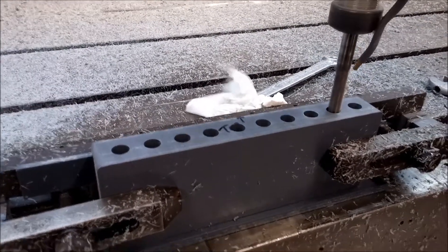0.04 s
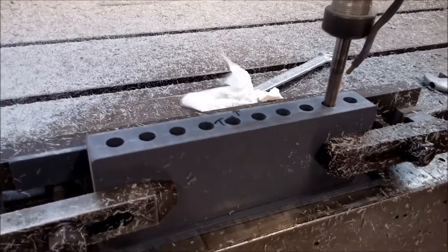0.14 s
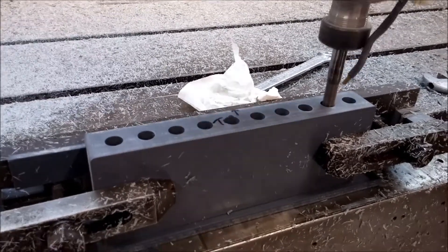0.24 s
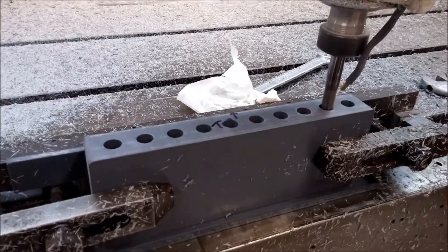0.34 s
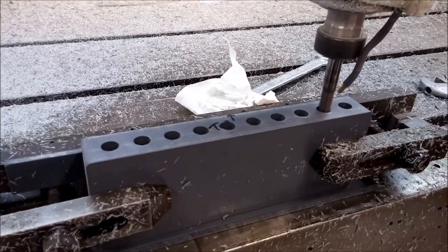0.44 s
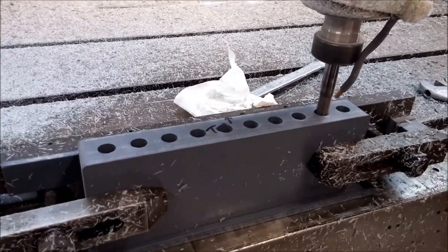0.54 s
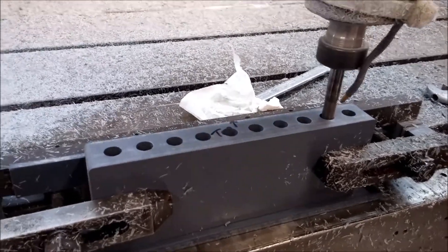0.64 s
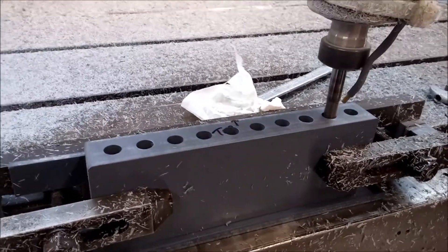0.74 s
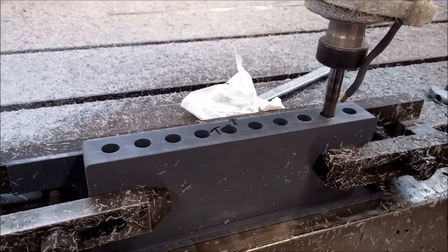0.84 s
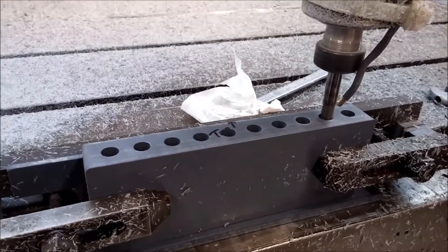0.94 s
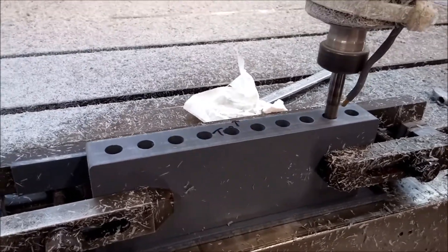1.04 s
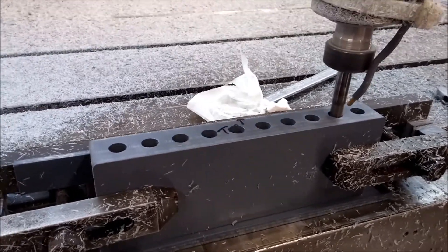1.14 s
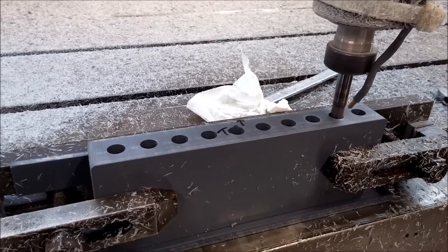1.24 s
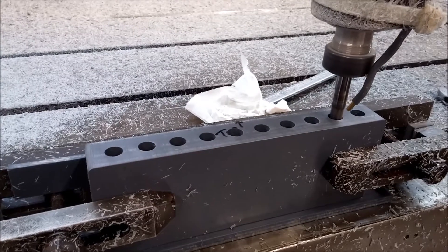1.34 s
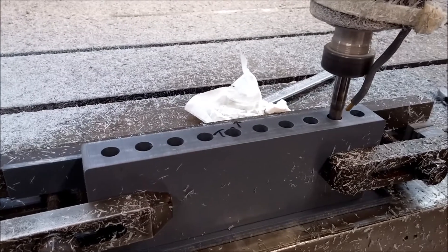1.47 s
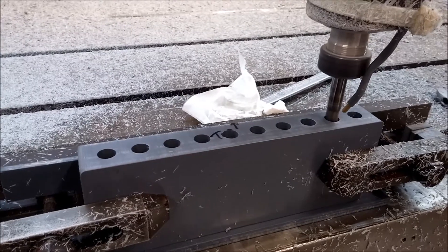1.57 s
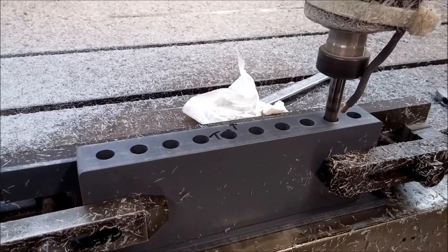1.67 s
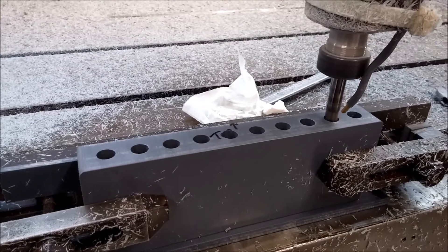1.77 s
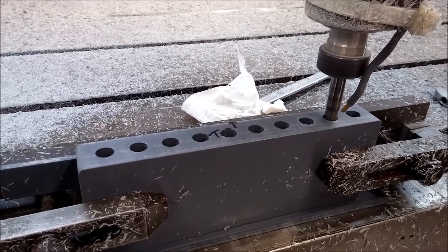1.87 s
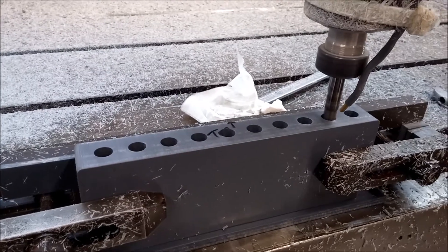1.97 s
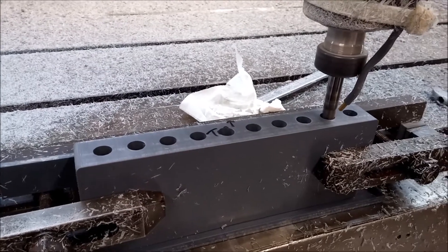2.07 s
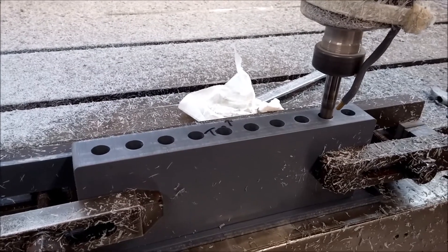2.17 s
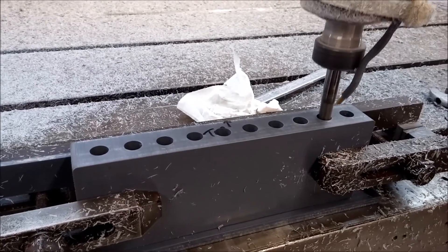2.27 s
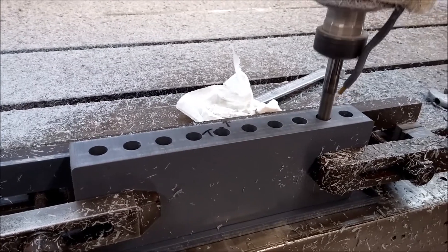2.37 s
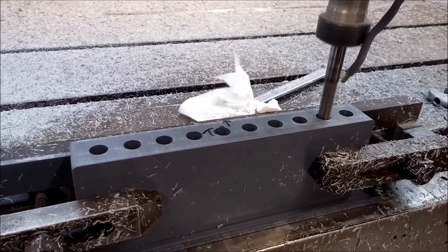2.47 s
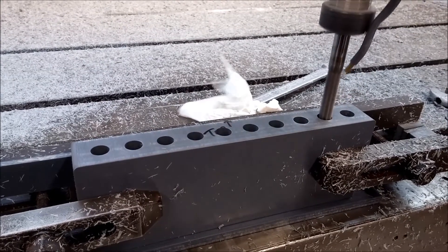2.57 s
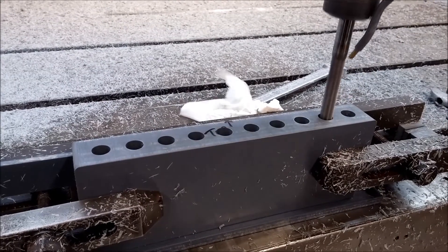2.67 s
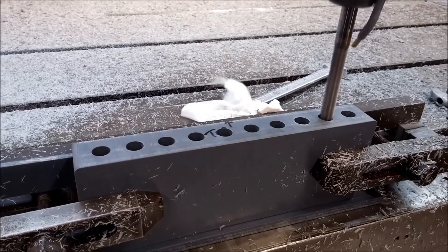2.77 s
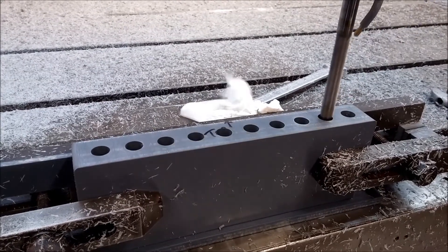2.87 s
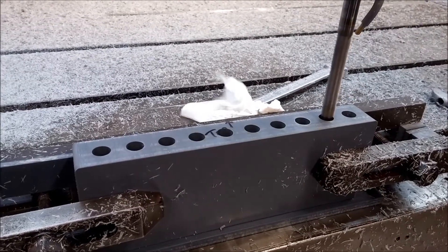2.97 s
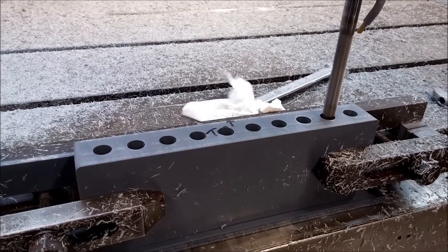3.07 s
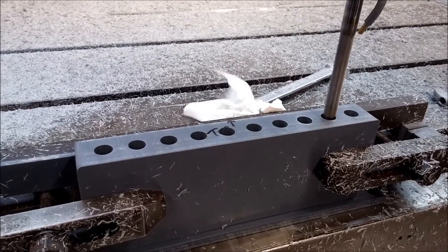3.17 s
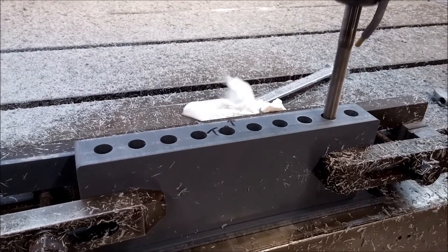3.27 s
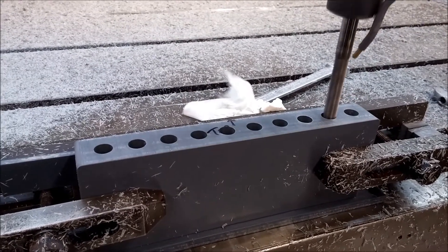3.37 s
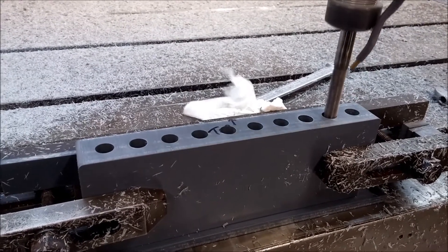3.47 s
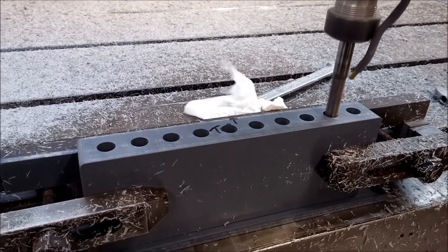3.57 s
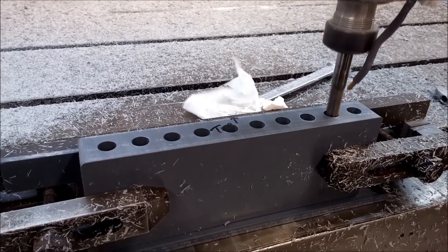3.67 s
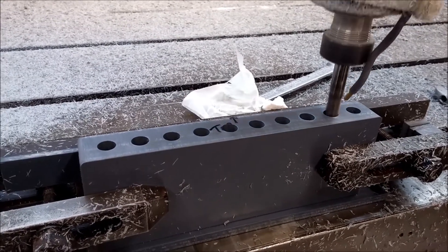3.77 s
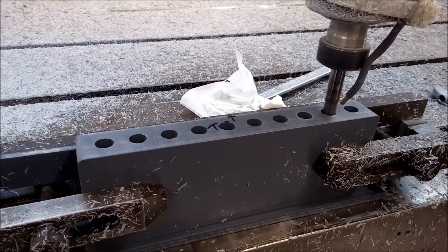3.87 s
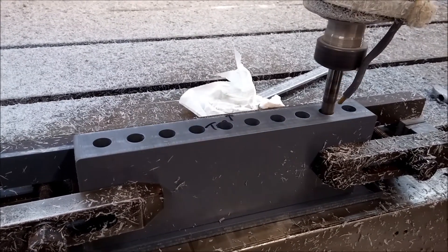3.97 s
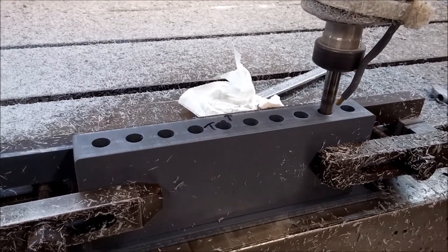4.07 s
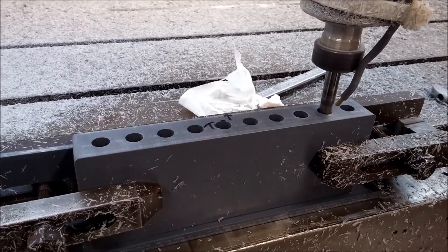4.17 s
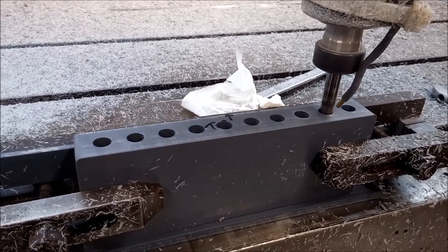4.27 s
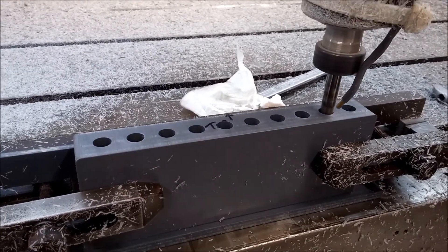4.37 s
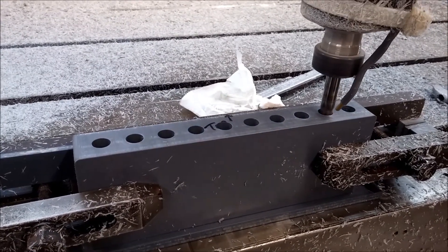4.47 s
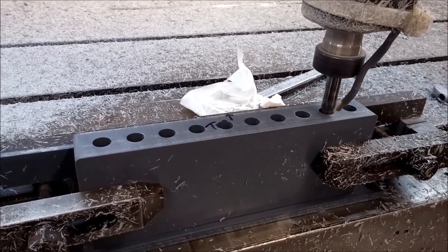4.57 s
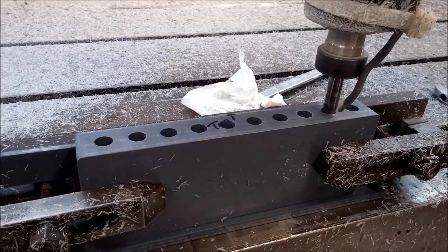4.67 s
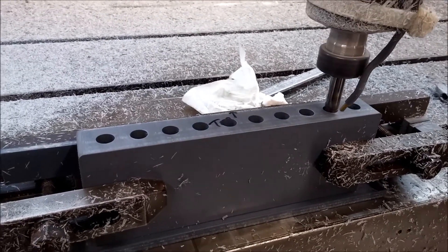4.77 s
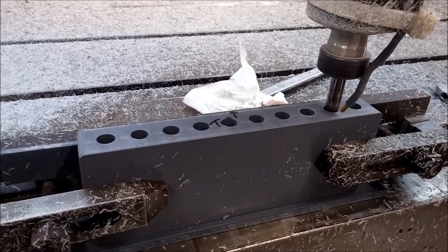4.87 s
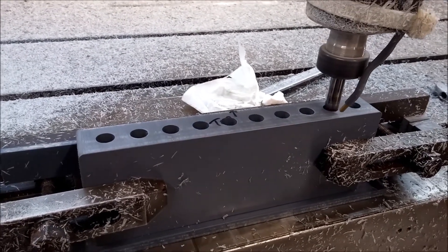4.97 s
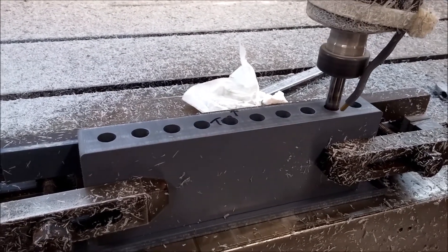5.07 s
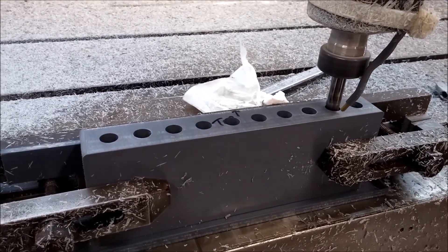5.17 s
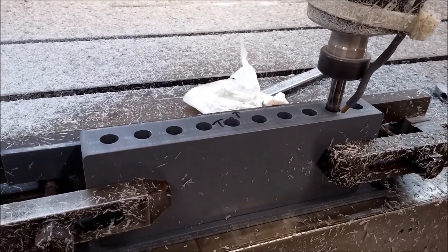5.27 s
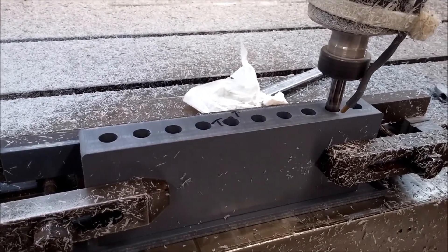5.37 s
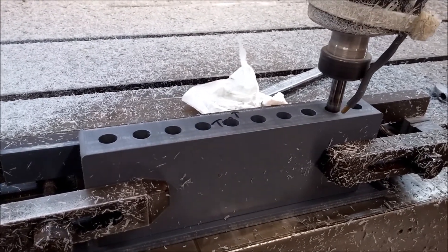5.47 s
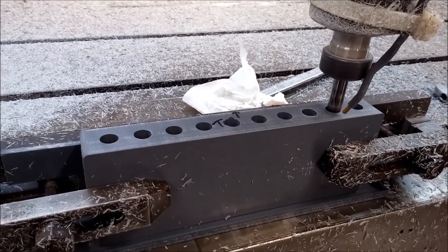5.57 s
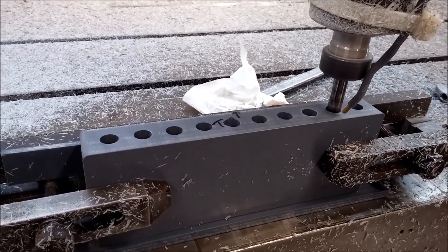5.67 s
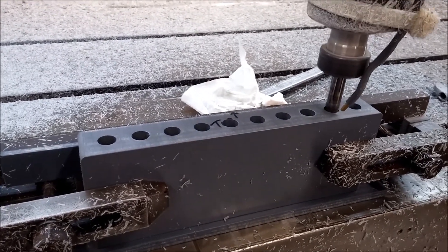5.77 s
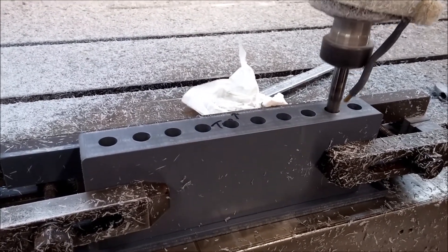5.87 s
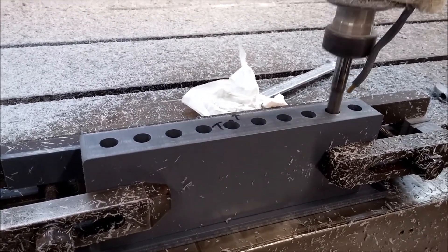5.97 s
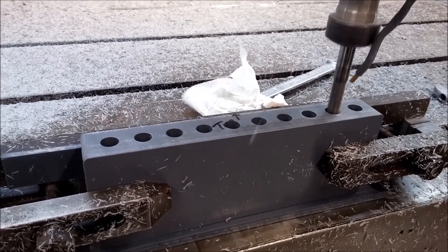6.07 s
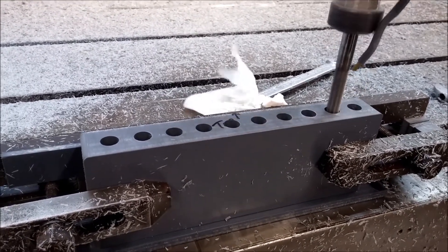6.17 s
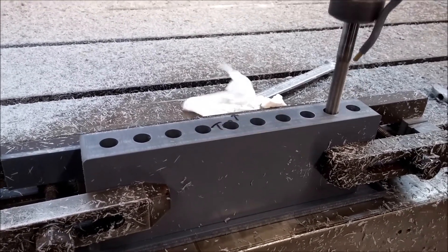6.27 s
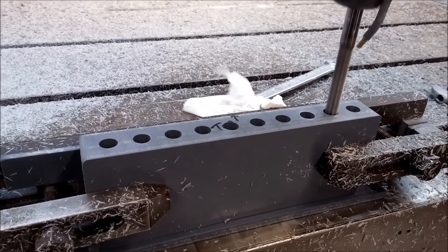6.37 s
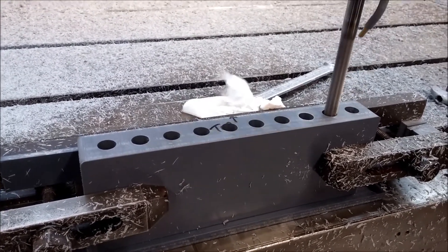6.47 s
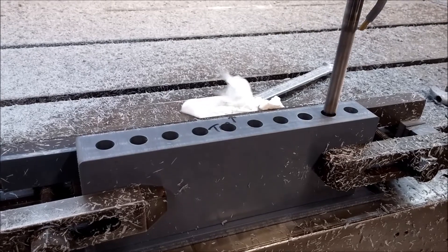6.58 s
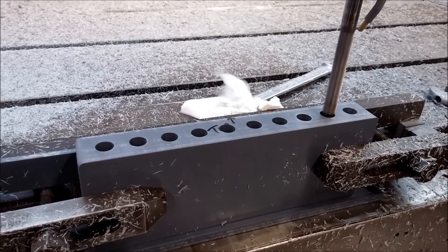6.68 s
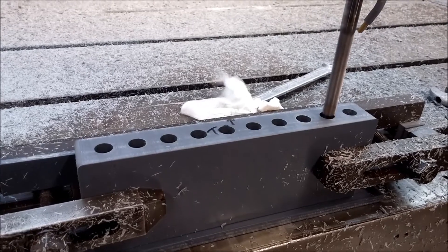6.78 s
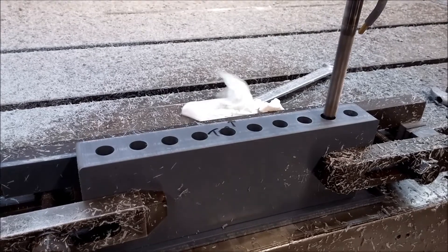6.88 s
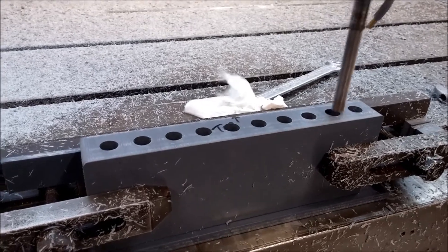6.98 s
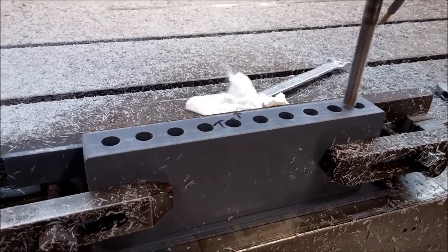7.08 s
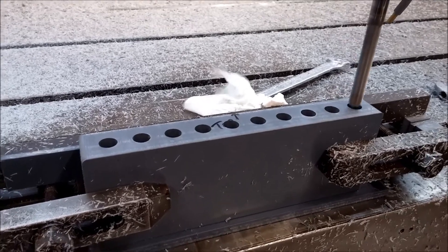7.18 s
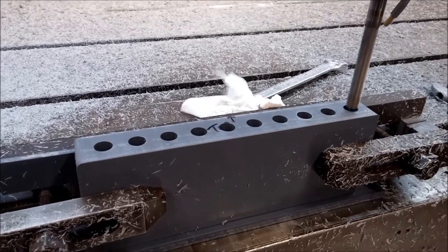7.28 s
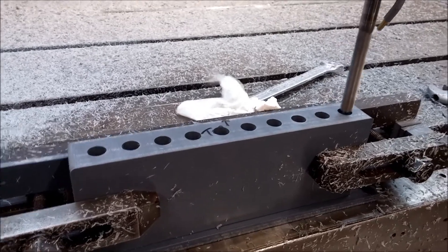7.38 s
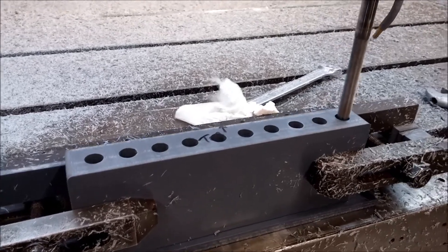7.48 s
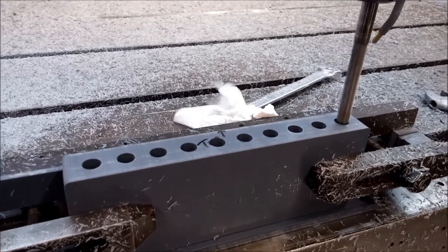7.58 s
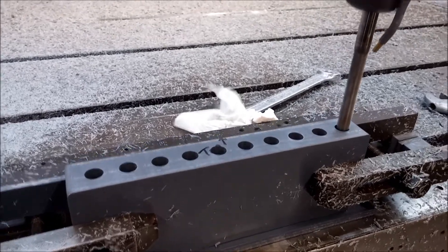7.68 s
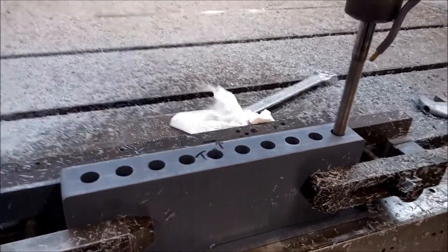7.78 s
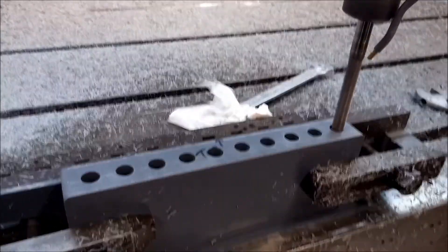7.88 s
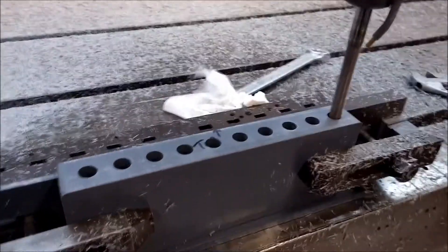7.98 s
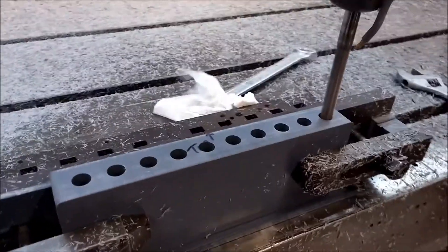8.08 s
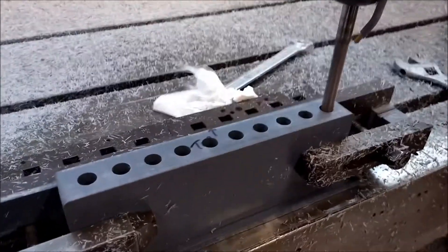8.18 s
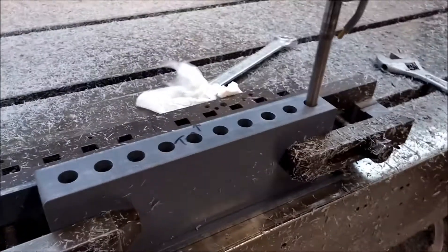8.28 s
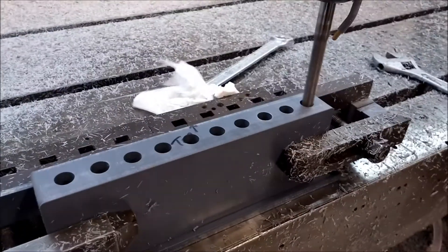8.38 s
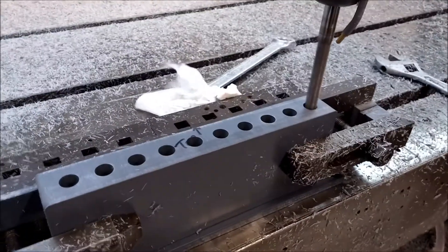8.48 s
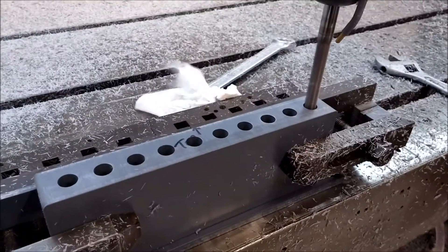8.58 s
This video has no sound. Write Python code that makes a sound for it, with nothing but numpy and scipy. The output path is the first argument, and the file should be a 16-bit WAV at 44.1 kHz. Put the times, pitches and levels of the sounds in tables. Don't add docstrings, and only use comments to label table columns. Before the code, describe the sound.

Broadband air spray dominates, washing over a metal table and a plastic block with holes. Blown holes give an airy, pipe-like whistle that wavers, locks in purer and breaks off. Irregular low pops and thuds hit the close microphone, densest early on. Two dips of the head are heard, then a louder hiss and plain airy wash; the spindle only hums faintly.

```python
import sys
import numpy as np
from scipy import signal
from scipy.fft import rfft, irfft, next_fast_len
from scipy.io import wavfile

SR = 44100
rng = np.random.default_rng(int(sys.argv[2]) if len(sys.argv) > 2 else 0)


def unload_audio(sound):
    columns = np.transpose(np.atleast_2d(sound))
    steps = np.round(np.clip(columns, -1, 1) * 32767)
    wavfile.write(sys.argv[1], SR, steps.astype(np.int16))


def gain_from_db(level_db):
    decades = np.asarray(level_db, float) / 20
    return 10 ** decades


N = 380123
TIME = np.arange(N) / SR


# f/Hz, density/dB per Hz
TABLE_WASH = [(60, -56), (156, -29), (400, -13), (750, -12), (1300, -9), (2300, -9), (3300, -10.5),
              (4900, -9.5), (7000, -21.5), (9000, -40.5), (11000, -20), (13800, -41), (15750, -24)]
BLOCK_HISS = [(2000, -29), (4200, -12.5), (5600, -3.5), (7100, -1), (8600, -1.5), (10000, -3),
              (11000, -1.5), (12500, -26.5), (15800, -59)]
FACING_SIZZLE = [(5000, -38), (8000, -16), (11000, -8), (12500, -2.5), (14200, -4), (15750, 2.5)]
# t/s, force on block/dB, facing the listener/dB, spill over table/dB
NOZZLE_PATH = [(.14, -24.5, -40, -28.5), (.48, -22, -21.5, -27.5), (.85, -24.5, -20.5, -27),
               (1.75, -28.5, -25, -30), (2.32, -29, -32.5, -32.5), (2.83, -23, -20, -28),
               (3.15, -23.5, -36, -29), (3.62, -24.5, -40, -27.5), (3.97, -21.5, -21.5, -27.5),
               (4.25, -28, -23.5, -27.5), (4.85, -29, -36, -33.5), (5.4, -33, -42.5, -37),
               (6.14, -31, -39.5, -33), (6.3, -21.5, -18, -26.5), (6.5, -17.5, -17.5, -26),
               (6.96, -22.5, -30, -25), (7.95, -24.5, -28, -25.5), (8.62, -18, -29, -27.5)]


def jet():
    force_db, facing_db, spill_db = in_time(NOZZLE_PATH)
    wash = gain_from_db(spill_db + 3.0) * hiss(colour, TABLE_WASH, patchy_db=0.97)
    low_pass = signal.butter(2, 950, fs=SR, output="sos")
    low_end = signal.sosfiltfilt(low_pass, wash)
    wash = wash - np.clip(0.61 * height(), 0, 1) * low_end
    close = gain_from_db(force_db + 1.0) * hiss(colour, BLOCK_HISS, patchy_db=0.97)
    sizzle = gain_from_db(facing_db + 5.0) * hiss(colour, FACING_SIZZLE, patchy_db=0.8)
    return wash + close + sizzle


# t/s, first mode f/Hz, level/dB, third mode f/Hz, level/dB
WHISTLE_PATH = [(0, 1785, -39, 5350, -43), (.24, 1800, -31, 5480, -31), (.57, 1833, -22, 5300, -24),
                (.95, 1821, -23.5, 5230, -21), (1.25, 1831, -23.5, 5300, -28.5),
                (1.8, 1801, -26.5, 5490, -29.5), (2.5, 1805, -24.5, 5526, -28),
                (2.83, 1829, -27, 5420, -29), (3.1, 1784, -28.5, 5440, -27), (3.42, 1776, -41, 5400, -42),
                (3.93, 1830, -27, 5440, -24), (4.35, 1811, -23.5, 5490, -32),
                (4.68, 1816, -23.5, 5533, -26.5), (4.98, 1829, -27, 5510, -26),
                (5.24, 1821, -33, 5500, -28.5), (6.06, 1852, -35, 5526, -26.5),
                (6.35, 1825, -23.5, 5400, -20.5), (6.78, 1787, -25.5, 5440, -28)]
# t/s, first mode f/Hz, level/dB, third mode f/Hz, level/dB
PARKED_HOLE = (7, 1775.5, -41, 5450, -37)
# peak t/s, build-up/s, level/dB
WHISTLE_LOCKS = [(5.035, 0.037, -18), (5.1, 0.053, -19), (5.16, 0.045, -17.5), (5.24, 0.048, -13.5),
                 (5.33, 0.046, -25), (5.439, 0.058, -21.5), (5.5, 0.048, -25), (5.77, 0.23, -13),
                 (5.9, 0.055, -26), (5.99, 0.074, -22.5), (6.04, 0.027, -30), (6.13, 0.034, -21),
                 (6.18, 0.027, -16), (6.265, .07, -19.5), (6.345, 0.032, -16.5), (6.55, 0.058, -20),
                 (7.32, 0.074, -27), (7.52, 0.16, -24), (7.7, .08, -25), (8.4, .1, -30)]
# start t/s, length/s, f/Hz, level/dB
NEIGHBOUR_HOLES = [
    (4.68, 0.3, 1791, -25),
    (6.172, 0.098, 1806, -20),
]


def holes():
    hz, level_db, third_hz, third_db = in_time([*WHISTLE_PATH, PARKED_HOLE])
    build_up_bend, break_off_s = 0.84, .04
    locks = [gain_from_db(db) * hump(s, 0, rise, break_off_s) ** build_up_bend for s, rise, db in WHISTLE_LOCKS]
    level = np.maximum(gain_from_db(level_db), np.max(locks, axis=0))
    sharp_hz = np.maximum(hz - PARKED_HOLE[1], 0)
    breath = .8 * np.exp(-0.045 * sharp_hz) * np.sqrt(gain_from_db(level_db) / level)
    unsteady_hz = hz + 24 * np.sqrt(breath) * drift(20)
    first = level * gain_from_db(-.6) * blown_mode(unsteady_hz, 35, breath)
    octave = gain_from_db(-26) * first ** 2 / gain_from_db(-10)
    beside = 0
    for s, length, beside_hz, db in NEIGHBOUR_HOLES:
        envelope = gain_from_db(db) * hump(s, length, 0.021, 0.046)
        beside = beside + envelope * blown_mode(np.full(N, beside_hz), 32, 0.077)
    third = gain_from_db(third_db - 2.0 + 1.37 * drift(3.9)) * blown_mode(third_hz, 175, 1)
    fifth_hz = 9293 - 220 * height()
    fifth = gain_from_db(driven("fifth") - 2.5 + 0.56 * drift(14.0)) * blown_mode(fifth_hz, 770, 1)
    return np.real(first + octave + beside), np.real(third + fifth)


# centre t/s, half length/s, f/Hz, width/Hz,
# level/dB
SWELLING_TONES = [(6.50, 0.049, 6330, 53, -19), (6.38, 0.07, 10300, 240, -16.5), (0.57, 0.36, 10250, 480, -23.5),
                  (2.76, 0.13, 10200, 450, -22.5), (2.8, 0.11, 6200, 550, -21.5), (4.0, 0.11, 11000, 420, -25),
                  (.52, 0.074, 6100, 400, -27), (1.2, 0.39, 15000, 220, -29), (8.45, 0.32, 7400, 360, -27),
                  (8.55, .25, 3800, 700, -25.5), (5.5, .3, 3690, 25, -46), (7.5, .45, 5900, 200, -33),
                  (4.1, .1, 5600, 660, -24)]


def swelling_tones():
    out = np.zeros(N)
    for s, half_s, hz, width_hz, db in SWELLING_TONES:
        near = abs(TIME - s) < 3 * half_s
        tone = blown_mode(np.full(near.sum(), hz), width_hz, width_hz / 120)
        swell = np.exp(-((TIME[near] - s) / half_s) ** 2)
        out[near] += gain_from_db(db) * swell * np.real(tone)
    return out


# t/s, peak level/dB, push +1 or pull -1
STRONG_EDDIES = [(0.5885, -4.5, -1), (.656, -4, -1), (.6755, -1.5, 1), (6.489, -9, 1), (.5982, -12, 1),
                 (0.7884, -10, 1), (0.8274, -3.5, 1), (0.8388, -11, -1), (.936, -8, 1), (1.0246, -5, 1),
                 (1.088, -4, 1), (1.139, -7, 1), (1.2617, -7, 1), (1.333, -8, 1), (1.385, -4, 1),
                 (1.5141, -4.5, 1), (1.5395, -5, -1), (1.6623, -3, 1), (1.6789, -2, -1), (2.5696, -2, 1),
                 (2.644, -4.5, 1), (2.6778, -6, 1), (4.0588, -6.5, -1), (4.2933, -7, 1), (4.3808, -4.5, 1),
                 (4.41, -5, -1), (4.4197, -7, -1), (6.246, -6.5, 1), (6.3048, -6, -1), (6.349, -8, 1)]


def buffeting():
    level_db = gust_db()
    eddies_per_s, stray_per_s, stray_over_db = 250, 28, 10
    sizes = gain_from_db(2.1 * np.minimum(rng.exponential(1, N), 3)) * rng.choice([-1, 1], N)
    clicks = sizes * (rng.random(N) < eddies_per_s / SR)
    stray = rng.random(N) < stray_per_s / SR
    strong = gain_from_db(level_db + stray_over_db) * np.sign(sizes) * stray
    s, peak_db, push = np.transpose(STRONG_EDDIES)
    strong[(s * SR).astype(int) - 6] = gain_from_db(peak_db) * np.sign(push)
    small = gain_from_db(level_db - 2.5) * rms_one(eddy(clicks, 536, 236))
    thud = gain_from_db(1.78 * level_db + 7.5) * rms_one(eddy(clicks, 170, 130))
    pops = gain_from_db(29.0) * eddy(strong, 520, 153)
    rocking = gain_from_db(-26) * np.exp(-((TIME - 6.4) / 0.12) ** 2) * drift(34.5)
    return small + thud + pops + rocking


def eddy(clicks, sharp_hz, rebound_hz):
    soft = signal.sosfilt(signal.butter(1, sharp_hz, fs=SR, output="sos"), clicks + 1e-18)
    soft = signal.sosfilt(signal.butter(1, sharp_hz * 3, fs=SR, output="sos"), soft)
    return signal.sosfilt(signal.butter(2, rebound_hz, "high", fs=SR, output="sos"), soft)


# start t/s, length/s, level/dB, decay/dB per s
AIR_GUSTS = [(0.57, .3, -23.5, 20), (1.0, .4, -23, 18), (1.5, .04, -24.5, 40), (1.66, .03, -25, 86),
             (1.89, 0.038, -27, 18), (2.3, .2, -34, 30), (2.57, 0.12, -25, 55), (2.79, .03, -28, 67),
             (3.78, 0.11, -40, 35), (3.967, 0.085, -27, 30), (4.07, 0.14, -23.5, 23), (4.375, .06, -24, 32),
             (4.63, .02, -28.5, 60), (4.8, 0.054, -36, 25), (6.27, .08, -24, 52), (6.49, 0.019, -26, 92),
             (6.58, .1, -35, 25)]


def gust_db():
    gusts = []
    for s, length, db, fall_db_per_s in AIR_GUSTS:
        rise = 173 * np.maximum(s - TIME, 0)
        fall = fall_db_per_s * np.maximum(TIME - s - length, 0)
        gusts.append(db - rise - fall)
    calm_db = -43.5 - 2 * height()
    return np.maximum(np.max(gusts, axis=0), calm_db) + 0.86 * drift(9.0)


# f/Hz, width/Hz, level/dB
CAVITIES = [(1052, 393, -2), (1127, 110, -2), (1573, 140, 2), (1752, 120, 4), (2010, 130, -1),
            (2240, 230, -5), (2750, 58, -5), (3250, 71, -1), (3633, 41, -1.5), (4350, 90, -11),
            (5440, 370, -5), (6570, 120, -1.5), (7380, 220, 0), (8530, 370, -4.5)]


def gaps():
    return gain_from_db(driven("spray") + 6.5) * hiss(resonances, CAVITIES, patchy_db=1.0)


# f/Hz, level/dB
SPINDLE_HUM = [(208, -58.5), (413, -51), (625, -50.5)]


def spindle():
    wobble = np.cumsum(1 + 0.00294 * drift(1.47)) / SR
    hum = 0
    for hz, db in SPINDLE_HUM:
        hum = hum + gain_from_db(db + 1.0 + 2.2 * drift(1.1)) * np.sin(2 * np.pi * hz * wobble)
    return hum


def machine_bed(x):
    t, step = TIME[:SR // 10], SR // 2
    t60_s, echo_db = .06, -8
    out = np.zeros(N + 2 * SR)
    for start in range(-step, N, step):
        first = max(start, 0)
        tail = rms_one(rng.standard_normal(len(t)) * gain_from_db(-60 * t / t60_s))
        response = gain_from_db(echo_db) * tail / np.sqrt(len(t))
        response[0] = 1
        window = np.hanning(2 * step)[max(-start, 0):][:N - first]
        heard = signal.fftconvolve(window * x[first:start + 2 * step], response)
        out[first:][:len(heard)] += heard
    return out[:N] * gain_from_db(0.33)


JET_DRIVE = {"spray": (-35.5, 0.23, 0.0129, 0.84, 2.5), "fifth": (-19, 0.67, 0.1857, -0.13, -8.5)}
# force/dB, facing/dB, spill/dB
MEAN_FLOW = [-27, -30, -30]


def driven(name):
    db, *shares, parked_db = JET_DRIVE[name]
    flow = zip(shares, in_time(NOZZLE_PATH), MEAN_FLOW)
    return db + sum(share * (now - mean) for share, now, mean in flow) + parked_db * height()


# start t/s, length/s, height gained (parked = 1)
HEAD_STROKES = [
    (.1, .35, -0.99),
    (2.9, .35, 0.99),
    (3.5, .45, -1.0),
    (6.55, .4, .75),
]


def height():
    moved = sum(gain * np.clip((TIME - s) / length, 0, 1) for s, length, gain in HEAD_STROKES)
    return np.clip(1 + moved, 0, 1.5)


def blown_mode(hz, width_hz, breath):
    rate_hz, size = width_hz * .8, len(hz)
    turbulence = (drift(rate_hz, size=size) + 1j * drift(rate_hz, size=size)) / np.sqrt(2)
    breath = np.clip(breath, 0, 1)
    swing = np.sqrt(1 - breath) + np.sqrt(breath) * turbulence
    return np.sqrt(2) * swing * np.exp(2j * np.pi * np.cumsum(hz) / SR)


def hiss(shape, table, patchy_db):
    size = next_fast_len(N)
    hz = np.arange(1, size // 2 + 2) * SR / size
    coloured = shape(table, hz) * rfft(rng.standard_normal(size))
    together, out = drift(9.3), 0
    patch = np.floor(np.log2(hz) * 2).astype(int) % 3
    for k in range(3):
        flicker_db = patchy_db * (.5 * together + 1.0 * drift(4.1))
        out = out + irfft(coloured * (patch == k), size)[:N] * gain_from_db(flicker_db)
    return rms_one(out)


def colour(spectrum, hz):
    table_hz, db = np.transpose(spectrum)
    return gain_from_db(np.interp(np.log(hz), np.log(table_hz), db))


def resonances(peaks, hz):
    power = 0
    for centre_hz, width_hz, db in peaks:
        detuning = 2 * (hz - centre_hz) / width_hz
        power = power + gain_from_db(2 * db) / (1 + detuning ** 2) ** 2
    return np.sqrt(power)


def drift(rate_hz, size=N):
    r = np.exp(-2 * np.pi * rate_hz / SR)
    noise = rng.standard_normal(size + SR // 2)
    return rms_one(signal.lfilter([1], [1, -2 * r, r * r], noise)[SR // 2:])


def hump(start, length, rise, fall):
    return np.interp(TIME, np.cumsum([start - rise, rise, length + 1e-4, fall]), [0, 1, 1, 0])


def in_time(rows):
    s, *columns = np.transpose(rows)
    return [np.interp(TIME, s, c) for c in columns]


def rms_one(x):
    return x / np.sqrt(np.mean(np.abs(x) ** 2) + 1e-20)


def noise_fills(mono):
    side, half = np.zeros(N), 1024
    window = np.sin(np.linspace(0, np.pi, 2 * half))
    bins_hz = np.arange(half + 1) * SR / (2 * half)
    for when, where in rng.random((26, 2)):
        start = int(when * (N - 2 * half))
        hz = 4700 + where * (15300 - 4700)
        span = slice(start, start + 2 * half)
        band = (abs(bins_hz - hz) < 350 + .06 * hz) & (bins_hz < 15750)
        random_phase = np.exp(2j * np.pi * rng.random(half + 1))
        side[span] += gain_from_db(-5.0) * window * irfft(abs(rfft(mono[span])) * band * random_phase)
    return side * [[1], [-1]]


def scene():
    whistle, upper_modes = holes()
    reflected = machine_bed(jet() + upper_modes)
    mono = reflected + gaps() + whistle + swelling_tones() + buffeting() + spindle()
    return np.stack([mono, mono])


def band_limit(x):
    return signal.sosfilt(signal.butter(12, 15990, fs=SR, output="sos"), x)


def record(dry):
    thin = signal.sosfilt(signal.butter(2, 90, "high", fs=SR, output="sos"), dry)
    cut = signal.sosfilt(signal.ellip(14, .5, 80, 15730, fs=SR, output="sos"), thin)
    mix = np.clip(cut + noise_fills(cut[0]), -1, 1)
    return band_limit(mix)


dry = scene()
out = record(dry)
unload_audio(out)
```